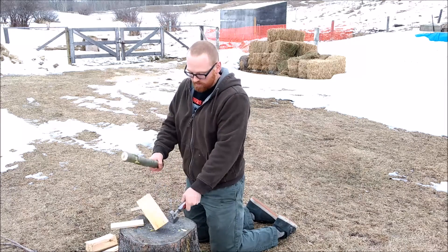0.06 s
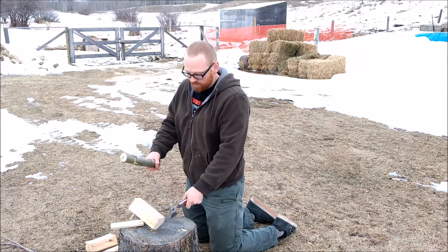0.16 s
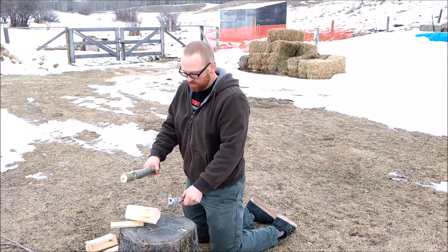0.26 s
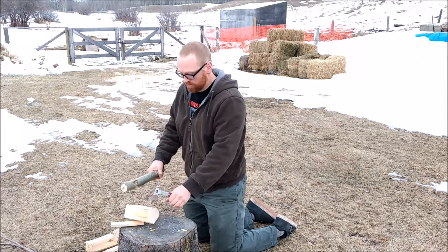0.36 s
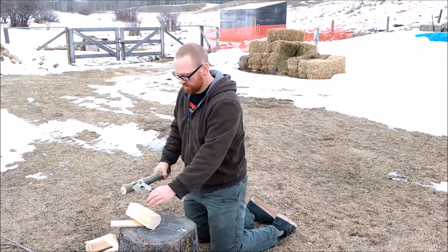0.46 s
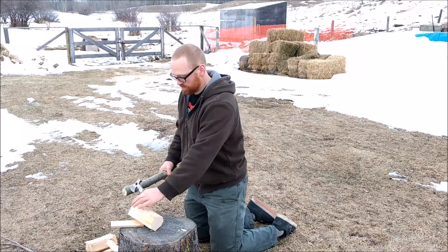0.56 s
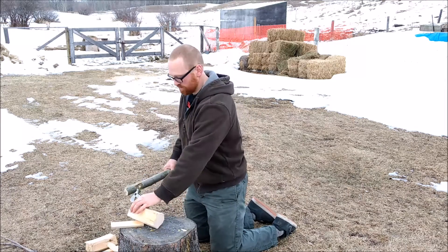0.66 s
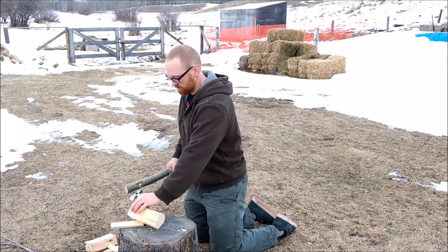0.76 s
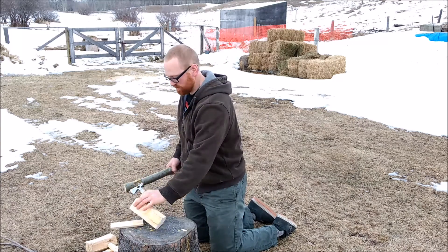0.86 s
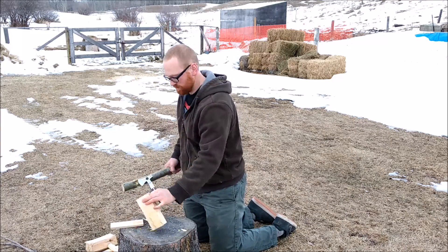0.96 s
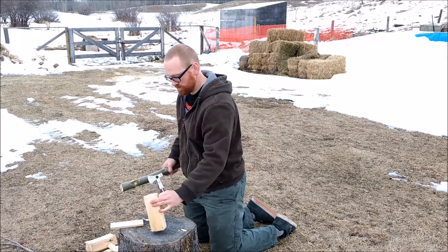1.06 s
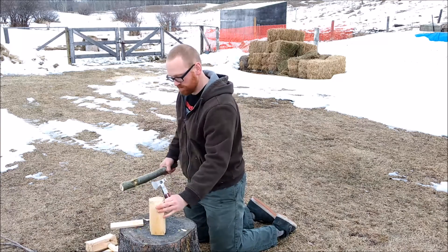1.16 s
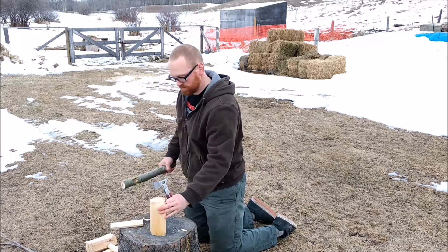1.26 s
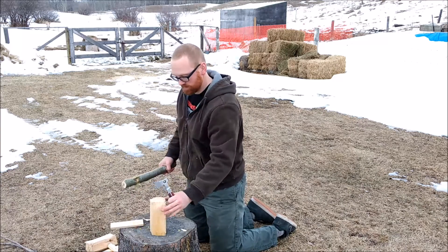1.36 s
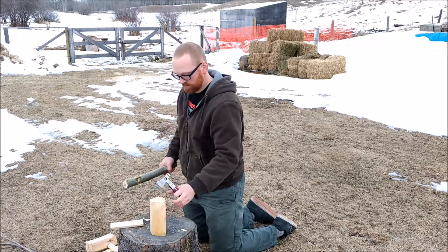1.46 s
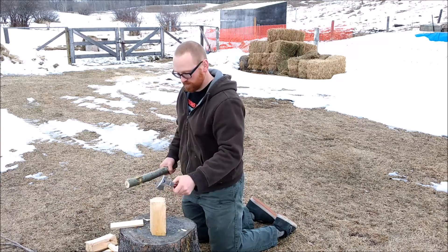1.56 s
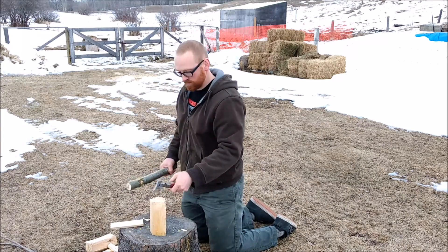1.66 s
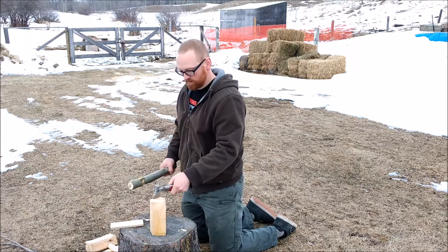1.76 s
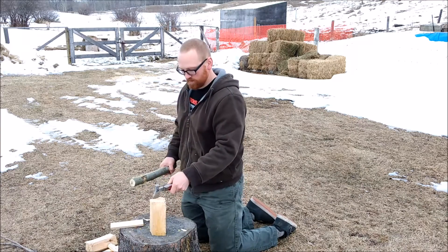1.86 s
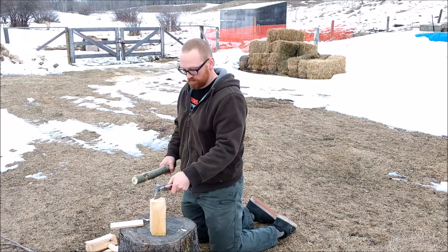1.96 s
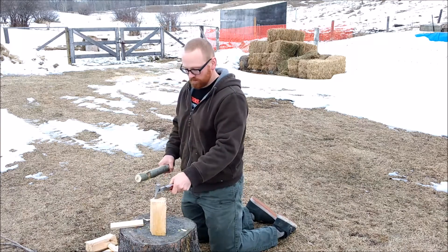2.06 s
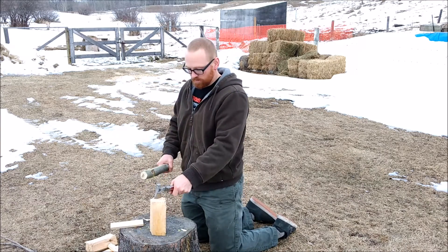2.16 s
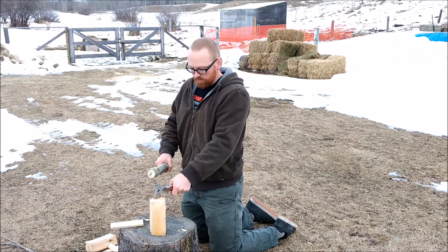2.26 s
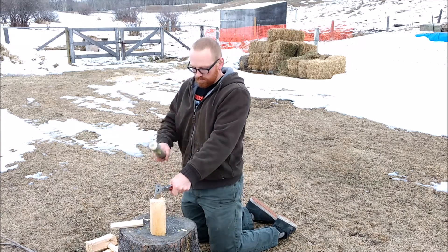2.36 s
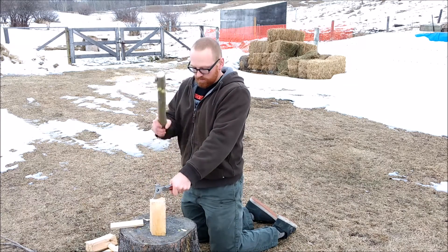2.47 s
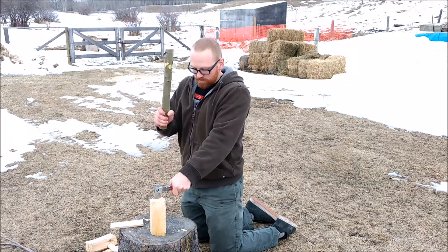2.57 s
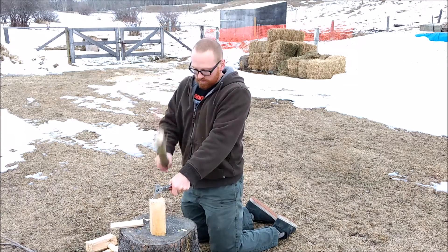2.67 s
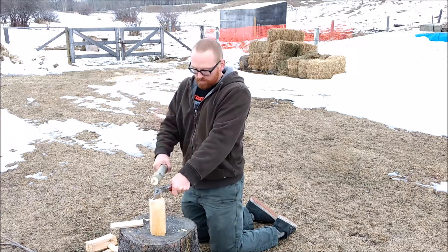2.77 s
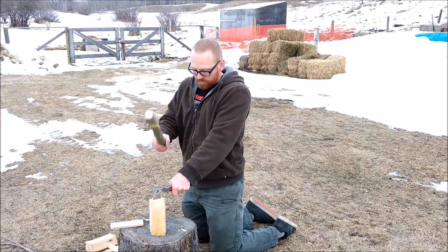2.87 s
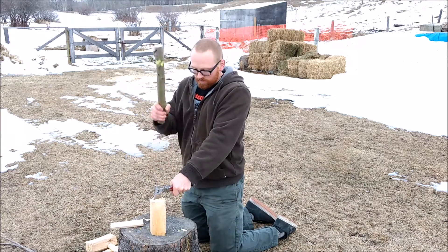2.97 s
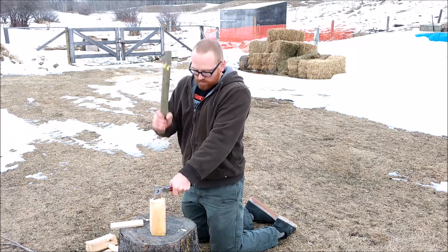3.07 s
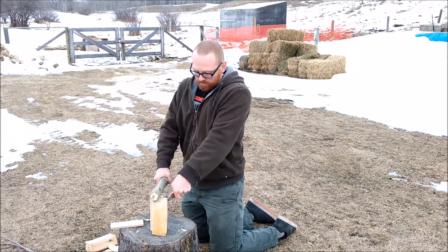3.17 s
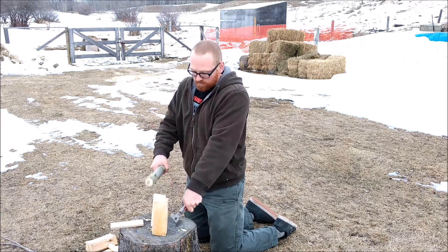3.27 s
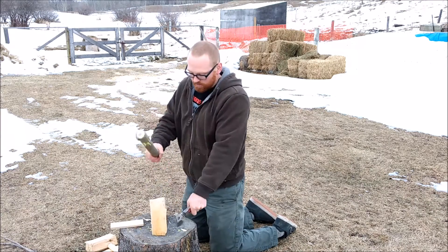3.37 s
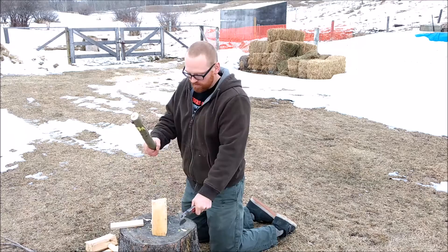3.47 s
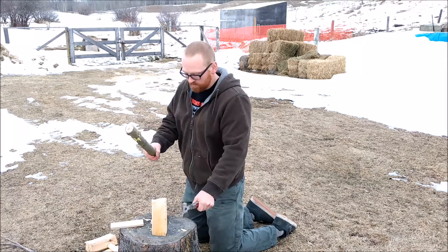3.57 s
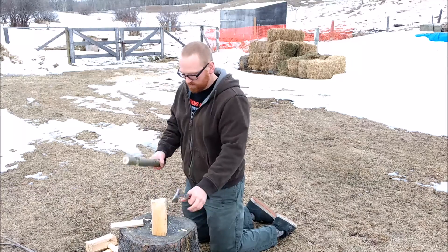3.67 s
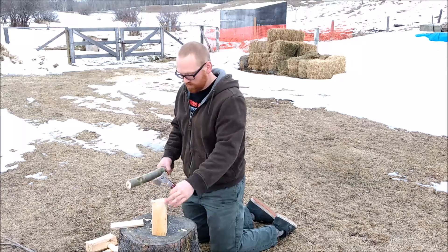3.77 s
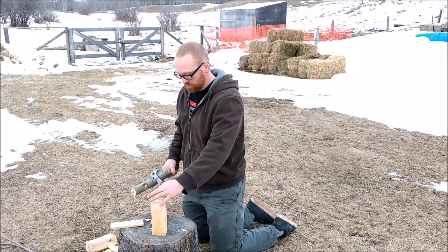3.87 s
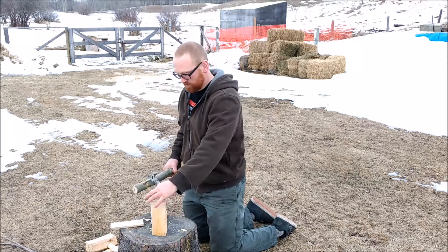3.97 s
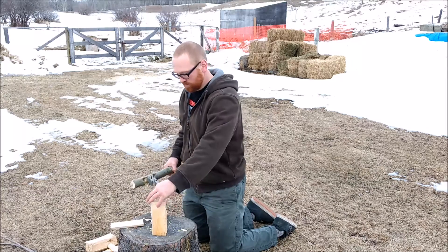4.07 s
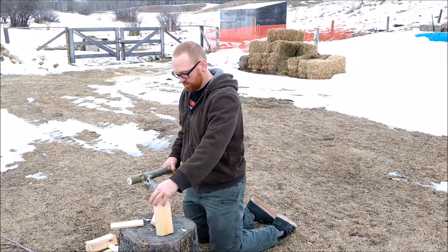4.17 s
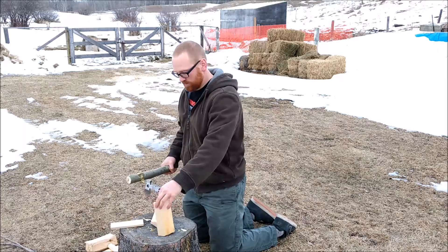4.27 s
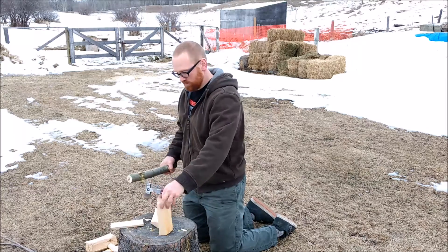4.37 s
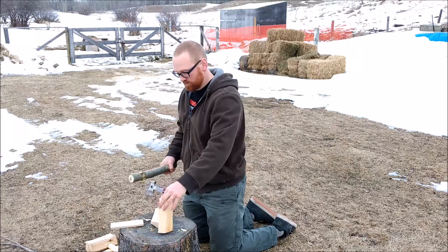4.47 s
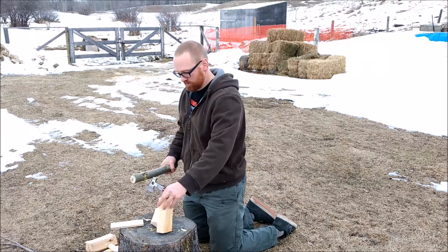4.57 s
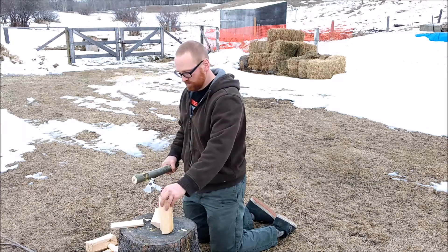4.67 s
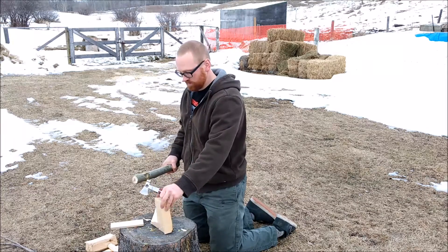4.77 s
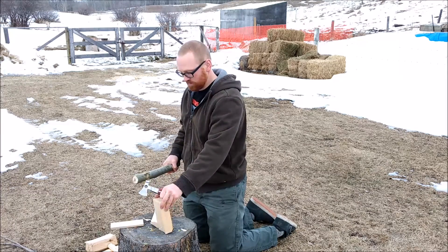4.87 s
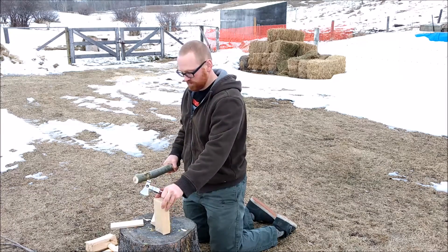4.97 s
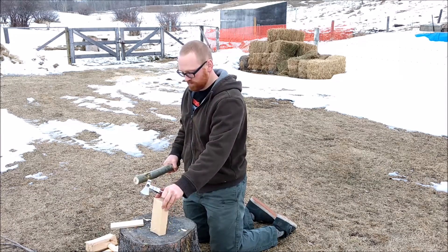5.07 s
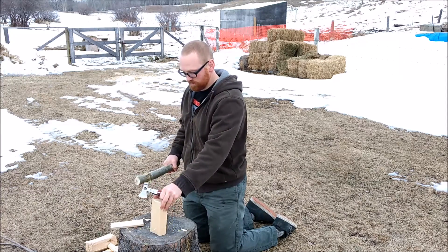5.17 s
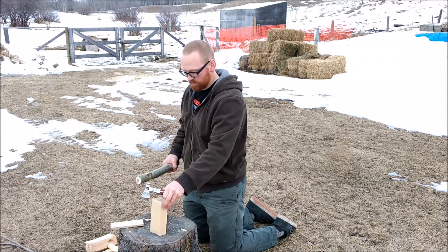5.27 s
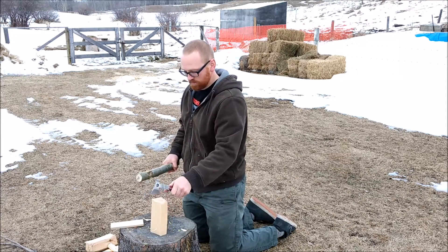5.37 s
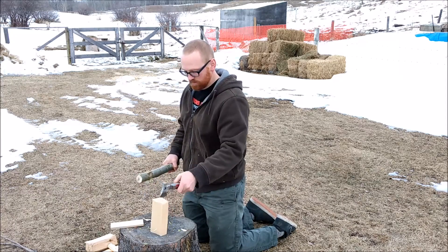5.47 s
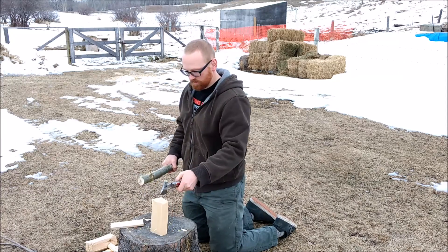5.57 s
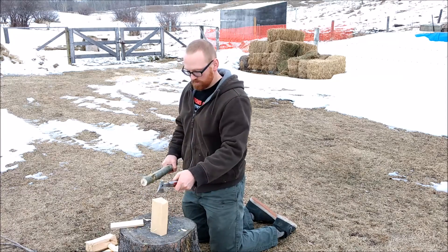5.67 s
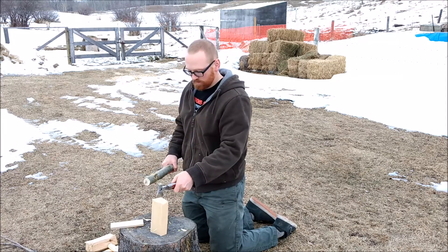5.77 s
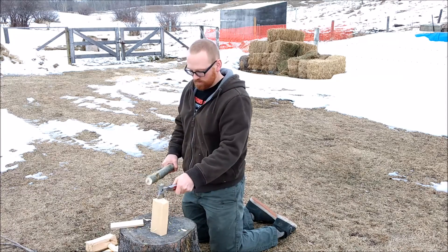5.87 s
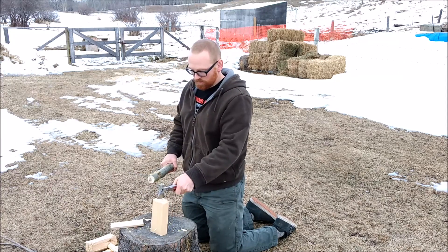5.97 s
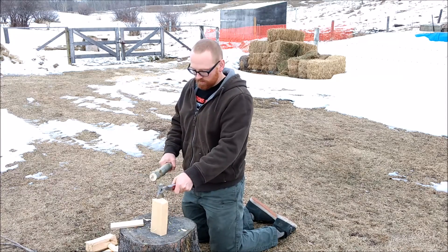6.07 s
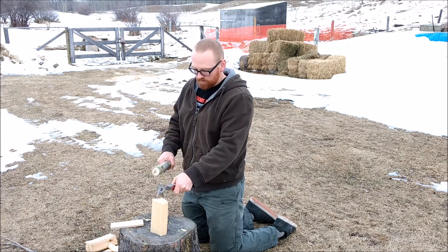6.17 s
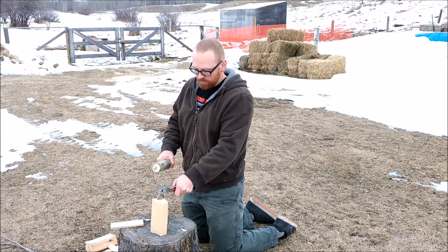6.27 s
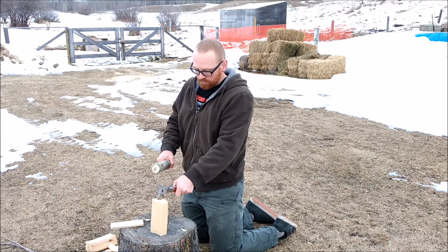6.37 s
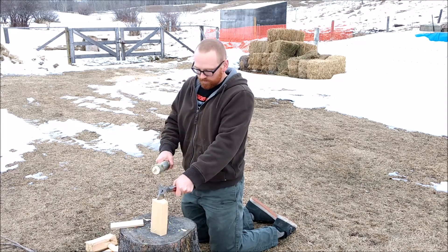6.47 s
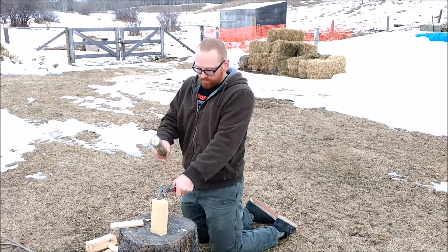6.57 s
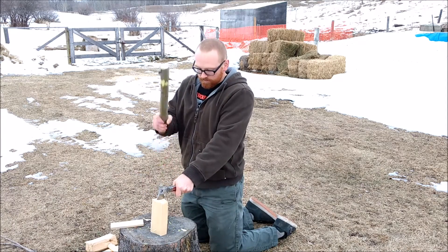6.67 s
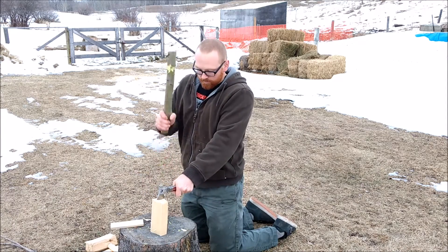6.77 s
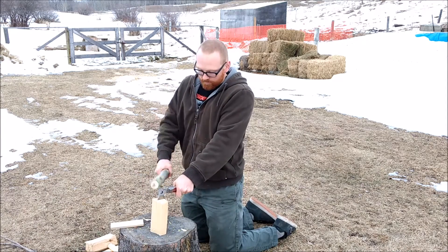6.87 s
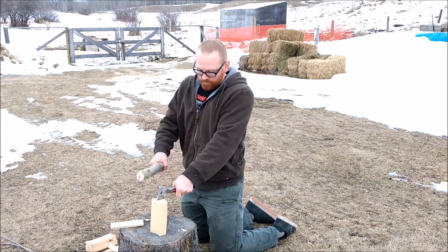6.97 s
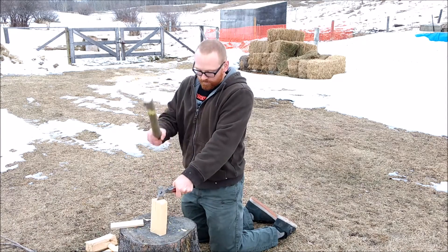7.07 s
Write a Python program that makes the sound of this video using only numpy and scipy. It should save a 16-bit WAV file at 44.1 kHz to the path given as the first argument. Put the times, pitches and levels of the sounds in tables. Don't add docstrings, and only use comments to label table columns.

```python
import sys
import numpy as np
from scipy import signal
from scipy.fft import rfft, irfft
from scipy.io import wavfile
from scipy.ndimage import uniform_filter1d

SR = 44100
rng = np.random.default_rng(int(sys.argv[2]) if len(sys.argv) > 2 else 0)


def attenuation_scalar(level_db):
    decades = np.asarray(level_db, float) / 20
    return 10 ** decades


def put_to_file(sound):
    columns = np.atleast_2d(sound).T
    safe = np.clip(columns, -1, 1)
    whole_steps = np.round(safe * 32767)
    wavfile.write(sys.argv[1], SR, whole_steps.astype(np.int16))


N = 313992

# frequency in Hz, level in dB, decay time t60 in seconds.
SEATING = [(221, -27.0, 0.0458), (502, -20.5, 0.0065), (780, 2.5, 0.0071), (1225, -3.0, 0.0188),
           (1508, 8.5, 0.0101), (2096, -12.0, 0.0167), (2608, -20.0, 0.0193), (3687, -20.5, 0.0191),
           (5081, -23.0, 0.015)]
SPLITTING = [(246, -13.5, 0.0282), (402, -19.0, 0.0069), (616, -1.5, 0.0153), (795, 6.5, 0.0131),
             (1074, -21.0, 0.0046), (1591, 16.0, 0.0082), (2081, 11.0, 0.0075), (2627, -10.0, 0.0559),
             (3502, 3.0, 0.0089), (5985, 5.0, 0.0187)]
DRIVING = [(233, -9.0, 0.0254), (545, 0.0, 0.0151), (891, -12.0, 0.0451), (1136, 18.5, 0.0069),
           (1298, 5.5, 0.0206), (2099, 2.5, 0.037), (3237, 2.5, 0.0085), (3593, -12.5, 0.0185),
           (5905, -2.0, 0.0141), (6994, 3.5, 0.0086)]
SLIVER = [(553, -27.5, 0.0381), (674, -9.5, 0.0106), (949, -9.5, 0.01), (1382, 4.5, 0.0145),
          (1673, -4.0, 0.0151), (2107, -14.5, 0.0177), (3199, -19.5, 0.0157)]
CHIP = [(702, -3.0, 0.0179), (845, 0.0, 0.0382), (1167, -12.0, 0.0311), (1586, 12.5, 0.0096),
        (1839, -3.0, 0.0221), (2202, 0.0, 0.0221), (3578, -4.0, 0.0434)]
HEAD = [(702, -5, .025), (1151, 21, .003), (1840, 3, .012), (2674, -.5, .068), (5895, -5, .022)]
BILLET = [(193, -18, .06), (583, -2, .024), (856, -4, .036), (1395, 10, .014), (1814, -1.5, .016),
          (2272, -1, .011)]
TOPPLE = [(610, -8, 0.027), (830, 2.5, 0.028), (1120, -6, 0.023), (1350, -1.5, 0.036), (1660, -5, 0.023),
          (2695, -12, .1)]
THUD = [(320, -8, 0.025), (540, 10, 0.013), (899, -5, 0.049), (1250, -3.5, 0.022)]

# struck body, then start in seconds, peak in dB, lead-in in dB relative to the peak,
# fibre crack in dB, crack t60 in ms.
BLOWS = [
    (SEATING, (2.7357, -4.1, -9.8, -29, 14)),
    (SPLITTING, (3.1872, -7.8, -25, -30, 14)),
    (DRIVING, (6.9078, -4.8, -16, -28, 13)),
]
# lateness in ms, level in dB relative to the blow, rise in ms,
# crack in dB relative to the first crack.
REBOUNDS = [
    (3.5, -22, .2, -6),
    (12.2, -39, .45, -25),
]
# struck body, its crack in dB, then hits as start in seconds, peak in dB, rise in ms.
TAPS = [
    (SPLITTING, -24, [(3.1893, -18, .2), (3.1916, -23, 0.22), (3.1945, -26.5, 0.26)]),
    (SLIVER, -39, [(3.2060, -30, 4.5), (3.2146, -10.7, 0.3), (3.2165, -27, 0.3), (3.2275, -37.5, 3)]),
    (TOPPLE, -37, [(.019, -40, 1.1)]),
    (CHIP, -33.5, [(3.325, -44.5, 0.44), (3.4047, -21.5, 0.38), (3.537, -43.5, 0.89), (3.592, -51, 0.76)]),
    (HEAD, -33, [(.0155, -45.5, 0.97), (.5475, -29, 0.27), (.570, -44, 0.11), (.577, -47, 0.45)]),
    (BILLET, -36, [(.258, -45.5, 0.79), (.283, -55, 1.2), (.298, -59, 1.1), (.311, -53, 1.9), (.320, -56, 0.78), (.357, -46, 1.8), (.678, -56, 0.55), (5.837, -29, 1.32), (6.2515, -34, 2.5)]),
    (THUD, -27, [(5.111, -35.5, 1.1)]),
]
# start in seconds, level in dB, centre in Hz,
# width in Hz, length in ms.
TOUCHES = [(.495, -71, 2270, 300, 9.6), (1.574, -64, 1770, 198, 21), (1.812, -61, 3600, 910, 10),
           (1.815, -61, 1890, 500, 7.7), (1.904, -65, 2380, 600, 13), (3.575, -57.5, 5870, 12000, 8),
           (3.575, -53.5, 920, 700, 8), (0.26, -65, 4130, 600, 10), (0.259, -58.5, 2000, 900, 6.9),
           (4.15, -68.5, 4000, 500, 30), (4.534, -54.5, 3740, 500, 8.9), (4.5345, -51, 13000, 12020, 3.5),
           (4.536, -59, 1830, 300, 8), (5.37, -67, 4200, 400, 20), (6.088, -57, 729, 400, 10)]
# frequency in Hz, level in dB.
CRACK = [(500, -23.5), (2000, 4), (4200, -1), (6200, 3), (8500, -5), (12000, -5), (15700, -5),
         (17000, -37.5)]
# delay in seconds, level in dB.
ECHOES = [
    (.042, -31.5),
    (0.092, -47),
]
# frequency in Hz, level in dB, phase in radians.
PORT_COLOUR = [(60, 3, -3.1), (300, 6, -2.6), (600, 3.5, -1.3), (950, 2, -.3), (1300, -5, .4),
               (1530, -15, -.3), (1800, 0, -.5), (2200, 0, 0)]

# frequency in Hz, level in dB.
ROAD = [(250, -22.5), (400, -6.5), (530, 1.5), (750, 1.5), (900, 0.5), (1100, -4.5), (1500, -14.5),
        (2200, -39)]
HUM = [(30, -17), (70, -11), (110, 4.5), (180, 1.5), (280, -13), (450, -9), (700, -42.5)]
HISS = [(40, 0), (300, 6.5), (1500, -1), (3000, -3), (6000, -5.5), (10000, -10.5), (15500, -12)]
# frequency in Hz, share from 0 to 1.
ROAD_ALIKE = [(300, 0.16), (600, .9), (1100, 1), (1600, 0.23)]
HUM_ALIKE = [(60, 0), (200, 0), (500, .5)]
HISS_ALIKE = [(1000, 1), (1800, 0.53), (2600, 0.92), (9000, 0.95)]
# centre in Hz, width in Hz, start in seconds,
# end in seconds, level in dB over the roar.
DRONES = [(532.4, 13.3, 3.03, 7.3, -10.5), (111, 24, 1.2, 7.3, -15.5), (330, 200, .2, 2.2, -16),
          (150, 70, .05, 2.3, -7), (184, 23, 0.35, 2.2, -11), (713, 90, 1.33, 3.5, -9),
          (740, 180, 5.01, 7.1, -2.5), (1460, 250, 3.9, 6.3, -18)]
# start in seconds, depth from 0 to 1, extra first dip in dB.
DUCKS = [(.03, 1, -4), (2.74, 1, -.5), (3.29, 1, -3), (6.46, .3, 0), (6.915, 1, -1)]
# time in seconds, level in dB over its usual level.
TRAFFIC = [(0, -1), (.6, 1), (1.2, 1), (1.8, .5), (2.4, .5), (2.73, 3), (3.5, -1), (4.2, .5), (5.2, 1),
           (5.6, .3), (6.3, 4), (6.6, .5), (7.12, .2)]

# level at full gain in dB, loss when ducked in dB, share of the traffic swing.
HISS_LEVEL, ROAD_LEVEL, HUM_LEVEL = (-70.5, 6.5, .2), (-58, 9.5, .95), (-58.5, 11.5, .4)
HUM_LEFT_DB, ROAD_LEFT_DB, HISS_EDGE_HZ = 1.5, 2, 15600
HOLD_S, RECOVER_S, DIP_S, FALL_S = .95, .85, .25, .012
LEAD_MS, LEAD_RISE_MS, BLOW_RISE_MS = 1.4, .85, .33
TAP_CRACK_SLOPE, TAP_CRACK_MS = .6, 13
WOOD_CYCLES, STEEL_HZ = 38, 2500
SCATTER_DB, SCATTER_T60 = -64.5, 0.75
STUMP_DB, STUMP_T60 = -21.5, 0.015
MATRIX_S = 24.8 / 44100
PORT_TAPS, PORT_LEAD = 160, 68
OFFSET = -.00013


def blows():
    out = np.zeros(N)
    for modes, (s, db, lead_db, crack_db, crack_ms) in BLOWS:
        lead_in = knock(modes, db + lead_db, LEAD_RISE_MS, crack_db - 7, crack_ms)
        add(out, s - LEAD_MS / 1000, lead_in)
        add(out, s, knock(modes, db, BLOW_RISE_MS, crack_db, crack_ms))
        for late_ms, late_db, rise_ms, less_db in REBOUNDS:
            rebound = knock(modes, db + late_db, rise_ms, crack_db + less_db, crack_ms)
            add(out, s + late_ms / 1000, rebound)
    return out


def taps():
    out = np.zeros(N)
    for modes, body_crack_db, hits in TAPS:
        for s, db, rise_ms in hits:
            crack_db = body_crack_db + TAP_CRACK_SLOPE * db
            add(out, s, knock(modes, db, rise_ms, crack_db, TAP_CRACK_MS))
    return out


def knock(modes, db, rise_ms, crack_db, crack_ms):
    t = np.arange(6000) / SR
    ring = np.zeros(len(t))
    for hz, mode_db, t60 in modes:
        if hz < STEEL_HZ:
            t60 = min(t60, WOOD_CYCLES / hz)
        dulled = 1 / (1 + (.6 * hz * rise_ms / 1000) ** 2)
        ring -= dulled * attenuation_scalar(mode_db - 60 * t / t60) * np.sin(2 * np.pi * hz * t)
    ring = ring * (1 - np.exp(-t * 1000 / rise_ms))
    low_cut = signal.butter(4, .8 * modes[0][0], "high", fs=SR, output="sos")
    ring = signal.sosfilt(low_cut, ring)

    grains_db = 3 * np.repeat(rng.standard_normal(len(t) // 20), 20)
    fibres = rng.standard_normal(len(t)) * attenuation_scalar(grains_db)
    crack_colour = attenuation_scalar(read(CRACK, np.fft.rfftfreq(len(t), 1 / SR)))
    fibres = evened(irfft(rfft(fibres) * crack_colour))
    tearing_db = crack_db - 60 * (1000 * t / crack_ms) ** 1.2
    return attenuation_scalar(db) * ring / abs(ring).max() + attenuation_scalar(tearing_db) * fibres


def touches():
    out = np.zeros(N)
    for s, *row in TOUCHES:
        add(out, s, touch(*row))
    return out


def touch(db, hz, width_hz, ms):
    length = round(ms * SR / 1000)
    r = np.exp(-np.pi * width_hz / SR)
    poles = [1, -2 * r * np.cos(2 * np.pi * hz / SR), r * r]
    scrape = signal.lfilter([1, 0, -1], poles, rng.standard_normal(2000))
    return attenuation_scalar(db) * evened(scrape[-length:]) * signal.windows.tukey(length, .6)


def farmyard(x):
    t = np.arange(SR // 3) / SR
    wide = rng.standard_normal(len(t)) * attenuation_scalar(-60 * t / SCATTER_T60) * (t > .004)
    close = rng.standard_normal(len(t)) * attenuation_scalar(-60 * t / STUMP_T60) * (t > .002)
    tail = attenuation_scalar(SCATTER_DB) * wide / np.linalg.norm(wide)
    tail = tail + attenuation_scalar(STUMP_DB) * close / np.linalg.norm(close)
    for s, db in ECHOES:
        smear = np.diff(rng.standard_normal(401)) * attenuation_scalar(-np.arange(400) * .08)
        add(tail, s, attenuation_scalar(db) * smear / np.linalg.norm(smear))
    return x + signal.fftconvolve(x, tail)[:N]


def matrix(hz):
    return -np.exp(-2j * np.pi * hz * MATRIX_S)


def ports(hz):
    phase = read(PORT_COLOUR, hz, order=2)
    return matrix(hz) * attenuation_scalar(read(PORT_COLOUR, hz)) * np.exp(1j * phase)


def left_port(x):
    response = irfft(ports(np.fft.rfftfreq(4096, 1 / SR)))
    response = np.roll(response, PORT_LEAD)[:PORT_TAPS]
    response = response * signal.windows.tukey(PORT_TAPS, .6)
    return signal.oaconvolve(x, response)[PORT_LEAD:][:N]


def yard():
    road = attenuation_scalar(-3.5) * noise(ROAD, ROAD_LEVEL, ROAD_ALIKE, left=ports, patchy_db=0.5, swell_db=1.0)
    hum = attenuation_scalar(-8.0) * noise(HUM, HUM_LEVEL, HUM_ALIKE, left=ports, patchy_db=-3.0, swell_db=2.3)
    road = (road + drones()) * attenuation_scalar([[ROAD_LEFT_DB], [0]])
    hum = hum * attenuation_scalar([[HUM_LEFT_DB], [0]])
    return road + hum + preamp_hiss()


def drones():
    t = np.arange(N) / SR
    out = np.zeros(N)
    for hz, width_hz, start, end, db in DRONES:
        band = filtered(rng.standard_normal(N), lambda f: 1 / (1 + (2 * (f - hz) / width_hz) ** 2))
        fade = np.clip(np.minimum(t - start, end - t) / 0.92, 0, 1)
        out += attenuation_scalar(db) * evened(band) * fade
    out = out * gain_curve(ROAD_LEVEL)
    return np.array([filtered(out, ports), out])


def preamp_hiss():
    hiss = attenuation_scalar(8.5) * noise(HISS, HISS_LEVEL, HISS_ALIKE, left=matrix, patchy_db=1.7, swell_db=0.54)
    hiss = np.array([filtered(side, lambda hz: hz < HISS_EDGE_HZ) for side in hiss])
    steps = np.repeat(rng.standard_normal(N // 128 + 1), 128)[:N]
    steps = evened(uniform_filter1d(steps, size=100))
    stutter_db = np.clip(6 * (1 - gain_curve(HISS_LEVEL) / attenuation_scalar(-74)), 0, 4)
    return hiss * attenuation_scalar(steps * stutter_db)


def noise(shape, level, alike, left, patchy_db, swell_db):
    frames, hz = N // 256 + 5, np.fft.rfftfreq(1024, 1 / SR)
    a, b, c, d, patches = rng.standard_normal((frames, 513, 5)).T
    patches = uniform_filter1d(patches, size=6, axis=0)
    patches = evened(uniform_filter1d(patches, size=8, axis=1))
    swell = evened(uniform_filter1d(rng.standard_normal(frames), size=9))
    alike = np.clip(read(alike, hz), 0, 1)[:, None]
    common = a + 1j * b
    own = c + 1j * d
    z = np.array([alike * common + np.sqrt(1 - alike ** 2) * own, common])
    z *= attenuation_scalar(read(shape, hz)[:, None] + patchy_db * patches + swell_db * swell)
    pair = evened(signal.istft(z, nperseg=1024, noverlap=768)[1][:, :N])
    pair = pair * gain_curve(level)
    return np.array([filtered(pair[0], left), pair[1]])


def gain_curve(level):
    full_db, ducked_db, share = level
    t = np.arange(N) / SR
    shut, dip_db = np.zeros(N), np.zeros(N)
    for s, depth, extra_db in DUCKS:
        fallen = np.clip((t - s) / FALL_S, 0, 1)
        held = np.clip(1 - (t - s - HOLD_S) / RECOVER_S, 0, 1)
        shut = np.maximum(shut, depth * fallen * held)
        dip_db += extra_db * fallen * np.clip(4 * (1 - (t - s) / DIP_S), 0, 1)
    traffic_db = share * np.interp(t, *np.transpose(TRAFFIC))
    return attenuation_scalar(full_db - ducked_db * shut + dip_db + traffic_db)


def evened(x):
    return x / np.sqrt(np.mean(x ** 2) + 1e-20)


def read(points, hz, order=1):
    table = np.transpose(points)
    return np.interp(np.log(hz + 1), np.log(table[0]), table[order])


def add(mix, s, sound):
    part = mix[round(s * SR):][:len(sound)]
    part += sound[:len(part)]


def filtered(x, gain):
    return irfft(rfft(x) * gain(np.fft.rfftfreq(N, 1 / SR)), N)


def scene():
    near = farmyard(blows() + taps() + touches())
    return np.array([left_port(near), near]) + yard()


def roll_off(x):
    return signal.sosfilt(signal.butter(12, 16560, fs=SR, output="sos"), x)


def record(dry):
    low_cut = signal.butter(2, 70, "high", fs=SR, output="sos")
    high_cut = signal.butter(12, 16250, fs=SR, output="sos")
    mix = signal.sosfilt(low_cut, dry)
    mix = signal.sosfiltfilt(high_cut, mix) + OFFSET
    return roll_off(mix)


dry = scene()
out = record(dry)
put_to_file(out)
```